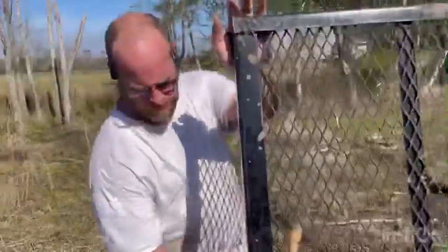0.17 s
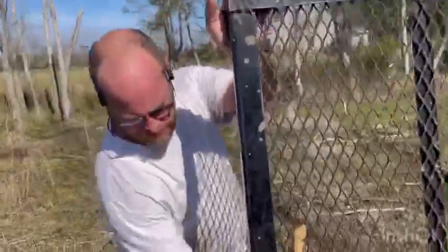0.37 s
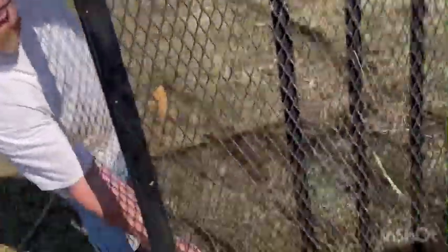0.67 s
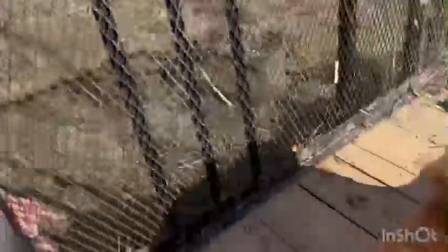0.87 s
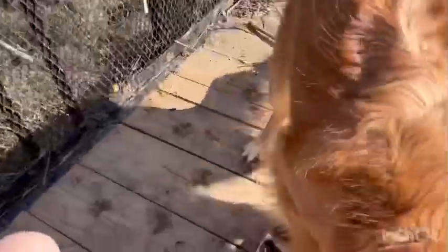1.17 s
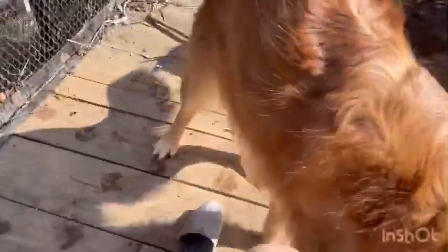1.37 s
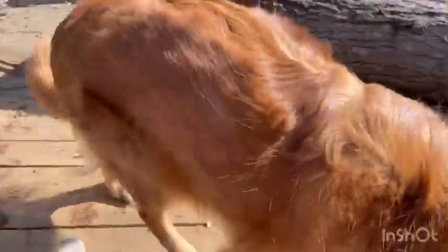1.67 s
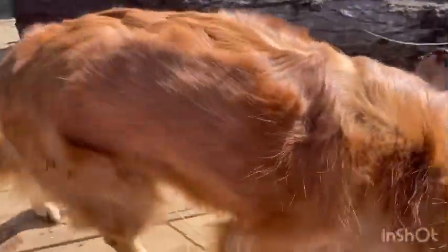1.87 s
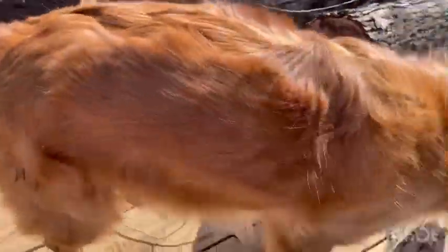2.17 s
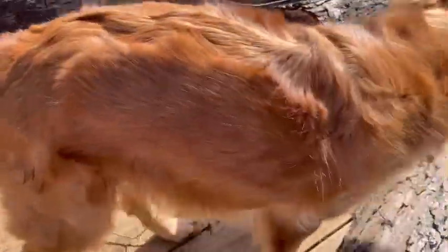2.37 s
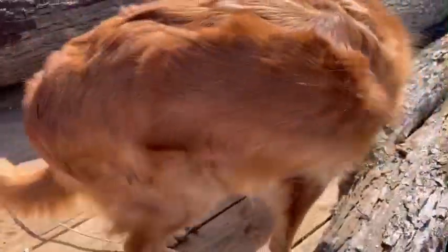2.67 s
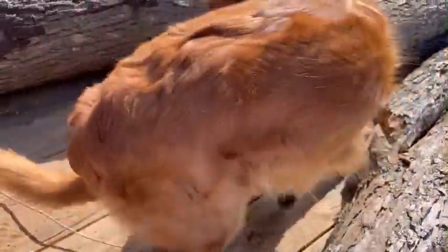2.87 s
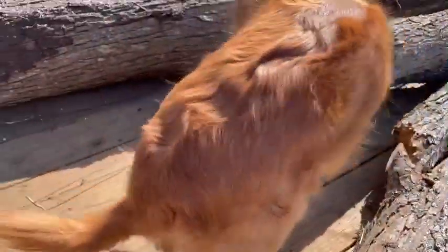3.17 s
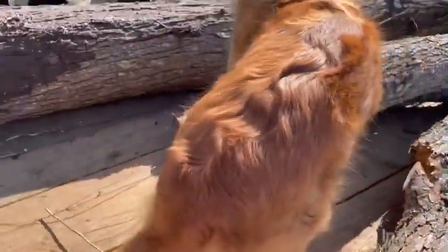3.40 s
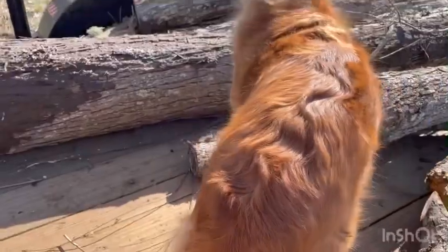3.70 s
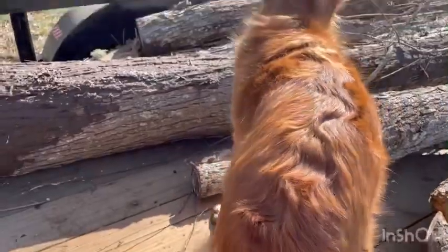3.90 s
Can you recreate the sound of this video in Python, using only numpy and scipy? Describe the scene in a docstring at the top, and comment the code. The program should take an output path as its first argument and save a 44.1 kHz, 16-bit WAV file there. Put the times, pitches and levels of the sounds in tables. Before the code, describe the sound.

Close outdoor sound of a chain-link gate being handled: mesh rustles and wires tick, then knocks grow into heavy rattling and a dry hinge squeal. Soft footfalls bump on a wooden deck, with thin piercing whistles and small squeaks, perhaps a dog whining. Near the end the latch grates and the frame clanks and rings briefly. Faint wind rumble and hiss lie underneath.

```python
"""A chain-link gate is handled outdoors near the microphone, over faint wind rumble and steady hiss (shaped noise).
From the start the mesh rustles (dense random contacts) and its wires tick; a far bird whistles, early and late.
Mesh and frame knock (noise bursts) and wires ring (decaying sines); the microphone turns from the mesh.
Feet bump on a wooden deck; the dry hinge squeals and groans (stick-slip partials). Thin high whistles and short
squeaks, perhaps a dog's whine, are gliding sines. At 3.4 s the gate closes: latch grates, frame clanks and rings."""
import sys
import numpy as np
from scipy import signal
from scipy.fft import rfft, irfft, next_fast_len
from scipy.io import wavfile
from scipy.ndimage import map_coordinates

SR = 44100
rng = np.random.default_rng(int(sys.argv[2]) if len(sys.argv) > 2 else 0)


def pcm_store(signal):
    """Save signal as 16-bit PCM."""
    levels = np.round(np.clip(np.atleast_2d(signal), -1, 1) * 32767)
    wavfile.write(sys.argv[1], SR, levels.astype(np.int16).T)


N = 178252
T = np.arange(N) / SR  # s

# shaking of the gate: t/s, effort/dB
EFFORT = [(0, -54), (.3, -59), (.35, -46.5), (.6, -42.5), (.84, -47), (1.03, -44), (1.42, -26), (1.6, -31),
          (1.97, -28), (2.33, -44.5), (2.5, -41.5), (2.95, -39.5), (3.27, -46.5), (3.56, -37),
          (3.82, -47.5), (4.04, -42)]
# mesh loudness as the microphone turns away: t/s, level/dB
FACING = [(0, 4.5), (.95, 0.5), (1.18, -8), (1.53, -5), (1.75, -15), (2.3, -18), (4.04, -21.5)]
# stereo width: f/Hz, side level/dB
WIDTH = [(60, -13), (150, -27.5), (300, -13), (700, -1.5), (1300, -6), (2500, -2), (6000, -0.5),
         (12000, -2.5)]
# spectrum of fine high hiss and chatter: f/Hz, relative level/dB
SIZZLE = [(3000, -9.5), (6000, -10), (9000, -11), (11500, -7), (12800, -16.5), (13600, -41.5),
          (15600, -21.5), (16400, -53)]
# spectrum of the frame's body: f/Hz, relative level/dB
BODY = [(30, -62.5), (150, -20.5), (420, 1), (720, -3), (1000, -7), (1350, -2), (1750, -9.5), (2200, -7.5),
        (3200, -13.5), (7000, -48)]
# spectrum of jingling wires and scraping grit: f/Hz, relative level/dB
JINGLE = [(900, -43.5), (2100, -0.5), (3000, 1), (4300, 1), (5700, -1.5), (9000, -24.5), (12000, -26),
          (13500, -37.5), (16000, -52)]
CONTACT_S = .0015  # decay constant of a contact's power


def amp(db):
    """Decibels to an amplitude factor."""
    return 10 ** (np.asarray(db) / 20)


def unit(x):
    """x scaled to rms 1."""
    return x / np.sqrt(np.mean(x ** 2) + 1e-20)


def along(points, hz):
    """(Hz, value) points interpolated on a log frequency axis."""
    f, v = np.transpose(points)
    return np.interp(np.log(hz + 1), np.log(f + 1), v)


def curves(rows):
    """One value per sample for each column after the time."""
    s, *cols = np.transpose(rows)
    return [np.interp(T, s, c) for c in cols]


def wobble(rate, size=N):
    """A smooth random curve, rate knots a second."""
    knots = rng.standard_normal(int(size * rate / SR) + 4)
    return map_coordinates(knots, [np.arange(size) * rate / SR])


def filtered(x, response):
    """x times a response of frequency."""
    m = next_fast_len(N + SR // 4)
    return irfft(rfft(x, m) * response(np.fft.rfftfreq(m, 1 / SR)), m)[..., :N]


def add(track, s, sound):
    """Mix a sound into a track at time s."""
    start = max(round(s * SR), 0)
    track[..., start:start + sound.shape[-1]] += sound[..., :N - start]


def mid_side_gain(hz):
    """Mid and side gains: the side level follows WIDTH."""
    return np.array([np.ones_like(hz), amp(along(WIDTH, hz))])


def spread(pair, spectrum):
    """Colour two unrelated signals and make them stereo, rms 1: narrow bass, wide treble."""
    mid, side = filtered(pair, lambda hz: amp(along(spectrum, hz)) * mid_side_gain(hz))
    return unit(np.array([mid + side, mid - side]))


def noise(spectrum):
    """Coloured stereo noise of rms 1."""
    return spread(rng.standard_normal((2, N)), spectrum)


def grains(spectrum, rate, scatter_db, life_s):
    """Countless tiny contacts of uneven size: noise under a sum of decaying powers, rms 1."""
    size = amp(scatter_db * np.minimum(rng.exponential(size=N), 4))
    contacts = (rng.random(N) < rate / SR) * size
    life = np.exp(-np.arange(SR // 100) / SR / life_s)
    power = np.abs(signal.fftconvolve(contacts ** 2, life)[:N])
    return spread(np.sqrt(power) * rng.standard_normal((2, N)), spectrum)


def strike(t, rise, t60):
    """A quick rise and an exponential decay."""
    return (1 - np.exp(-t / rise)) * amp(-60 * t / t60)


def shaking():
    """The frame rumbles in lumps while the linked wires rub and chatter, under a fine high sizzle."""
    # spectra of frame rumble and wire rattle: f/Hz, relative level/dB
    rumble_spectrum = [(20, -33), (40, -30), (60, -2), (80, -2), (115, 3.5), (160, -4.5), (205, -1),
                       (260, -5), (305, -12.5), (350, -9), (480, -13.5), (620, -17.5), (900, -22),
                       (2000, -66)]
    rattle_spectrum = [(200, -58), (450, 13), (800, -0.5), (1200, 4.5), (1700, 2), (2500, 3.5), (4000, -6),
                       (6300, -11), (9000, -25.5), (13000, -32)]
    rumble_db, rattle_db, sizzle_db = 1, -2.5, -5.5  # relative to the effort
    sizzle_shading = 1.54  # treble fades this much faster as the microphone turns
    effort_db, = curves(EFFORT)
    facing_db, = curves(FACING)
    jolt = wobble(29.9)
    rumble = amp(effort_db + rumble_db + 1.8 * jolt) * noise(rumble_spectrum)
    rattle = amp(effort_db + rattle_db + facing_db + 1.3 * jolt) * grains(
        rattle_spectrum, rate=1800, scatter_db=4.5, life_s=0.0029)
    sizzle = amp(effort_db + sizzle_db + sizzle_shading * facing_db) * grains(
        SIZZLE, rate=770, scatter_db=4.0, life_s=0.0036)
    return rumble + rattle + sizzle


def background():
    """A faint rumble of moving air, low-passed noise in gusts, and a steady hiss."""
    # wind: t/s, relative level/dB
    wind_level = [(0.0, -62), (1.28, -50), (1.57, -52), (1.62, -54), (1.97, -40.5), (2.01, -51.5),
                  (2.8, -58.5), (2.9, -30.5), (3.09, -48), (3.23, -30.5), (3.27, -51.5), (3.66, -47.5),
                  (3.72, -57), (4.04, -31)]
    # spectra: f/Hz, relative level/dB
    wind_spectrum = [(15, -8.5), (40, -1), (65, 7), (150, -39.5), (400, -90)]
    hiss_spectrum = [(3000, 3), (6500, -14.5), (9000, -6.5), (10000, 1), (11500, -30.5), (13000, -26)]
    wind_db, gust_db, hiss_db = -2.5, 4, -64.5
    wind = amp(curves(wind_level)[0] + wind_db + gust_db * wobble(6)) * noise(wind_spectrum)
    return wind + amp(hiss_db) * noise(hiss_spectrum)


def ticks():
    """Wires snap over each other, bright and almost without ring; lesser snaps come by chance."""
    # single wire snaps: t/s, relative level/dB, low clack relative to the snap/dB
    snap_rows = [(0.0295, -39.5, 13.5), (0.047, -32, -25), (0.055, -39, -15), (0.175, -30.5, -24),
                 (0.5943, -22, -16), (0.658, -22, -18), (0.6858, -26, -7), (0.7726, -19.5, -16),
                 (0.8115, -24, -10), (0.915, -20.5, -5.5), (0.9384, -25, -17), (0.9882, -35, -12),
                 (1.0246, -18.5, 2), (1.0671, -22.5, 1), (1.114, -25.5, -15), (1.21, -26, -16),
                 (1.2526, -19, -17), (1.261, -17.5, -15), (1.2994, -20, -9.5), (1.3507, -15.5, -24),
                 (1.366, -18, 1), (1.662, -20, -19), (1.741, -23, 9), (1.905, -24.5, -20),
                 (2.0563, -33.5, 4), (2.143, -52, 0.5), (2.532, -27.5, 6.5), (2.7781, -30.5, 5.5),
                 (3.164, -38.5, -15), (3.3703, -27, -1), (3.380, -20, -2), (3.9915, -42.5, 14.5)]
    rise_s, t60_s, tail_db, tail_t60_s = .0002, .009, -13, .035
    stray_per_s, stray_db, stray_scatter_db = 33, -5, 3.5  # stray_db: relative to effort and facing
    snaps, clacks, t = np.zeros(N), np.zeros(N), np.arange(SR // 8) / SR
    shape = strike(t, rise_s, t60_s) + amp(tail_db) * strike(t, rise_s, tail_t60_s)
    for s, db, clack_db in snap_rows:
        add(snaps, s, amp(db - 8.5) * shape)
        add(clacks, s, amp(db - 7.0 + clack_db) * shape)
    level_db = curves(EFFORT)[0] + curves(FACING)[0] + stray_db
    level_db = level_db + stray_scatter_db * rng.standard_normal(N)
    strays = signal.fftconvolve((rng.random(N) < stray_per_s / SR) * amp(level_db), shape)[:N]
    # f/Hz, relative level/dB
    bright = [(1200, -10), (2600, -1.5), (5000, 14.0), (9500, 5.5), (12500, 8.5), (16000, -13.5)]
    return (snaps + strays) * noise(bright) + clacks * noise(BODY)


def bird():
    """Far whistles that swell and die while their pitch falls ever faster."""
    # whistles: t/s, start f/Hz, level/dB, length/s
    whistles = [(0.215, 2680, -54, 0.18), (3.689, 2780, -58.5, 0.2)]
    sag_hz_per_s2 = 14000
    out = np.zeros(N)
    for s, hz, db, length_s in whistles:
        t = np.arange(int(length_s * SR)) / SR
        phase = 2 * np.pi * np.cumsum(hz - sag_hz_per_s2 * t ** 2) / SR
        swell = amp(db + 3.3 * wobble(160, size=len(t))) * np.sin(np.pi * t / length_s) ** 2
        add(out, s, swell * np.sin(phase))
    return out


def resonant(x, resonances):
    """x with narrow second-order resonances ringing on top of it, rms 1."""
    def response(f):
        return 1 + sum(amp(db) * 1j * f * width / (hz * hz - f * f + 1j * f * width)
                       for hz, width, db in resonances)
    return unit(filtered(x, response))


def knocks():
    """The mesh slaps its frame: wires jingle first; the heavy frame swings up and settles more slowly."""
    # slaps: t/s, frame blow/dB, wire jingle/dB, low thud/dB, body t60/s
    slaps = [(0.325, -31, -39.5, -34, 0.27), (0.431, -26, -41.5, -34, 0.42), (0.593, -53, -33, -17, 0.031),
             (0.618, -50, -30, -34.5, 0.19), (0.683, -27.5, -24, -27, 0.088),
             (0.914, -16.5, -50, -40, 0.095), (0.925, -28, -55, -50, 0.04), (1.023, -24, -55, -50, 0.18),
             (1.084, -47, -35, -23.5, 0.13), (1.208, -28, -35, -30, 0.1), (1.225, -25, -44, -29.5, 0.23),
             (1.495, -20.5, -30.5, -35.5, 0.7), (1.527, -17.5, -28.5, -40, 0.19),
             (1.580, -26, -36, -23.5, 0.28), (1.755, -21, -37.5, -29, 0.18), (1.871, -28, -30, -23.5, 0.36),
             (2.053, -27.5, -34, -22.5, 0.17), (2.392, -27.5, -31, -23.5, 0.42),
             (2.604, -34.5, -29, -38.5, 0.078), (2.806, -23.5, -28.5, -18.5, 0.32),
             (3.309, -31, -52, -29.5, 0.3), (3.372, -23.5, -21, -20.5, 0.15),
             (3.384, -22.5, -28, -19.5, 0.16), (3.412, -18, -30, -37, 0.52), (3.447, -26, -36, -49, 0.4)]
    # shivers of the whole mesh: t/s, level/dB
    shivers = [(1.503, -24), (3.405, -26.5)]
    # low thud spectrum: f/Hz, relative level/dB
    thud_spectrum = [(20, -44), (40, -13.5), (85, 2), (120, 9.5), (160, 2.5), (205, 5), (300, 1),
                     (370, -0.5), (600, -9), (1000, -31.5), (3000, -77)]
    # air resonances of the hollow frame tube, excited by the wires: f/Hz, width/Hz, level/dB
    tube = [(1360, 45, 9), (2170, 45, 4.5), (2810, 33, 8), (3670, 40, 9.5), (4400, 60, -2.5),
            (5070, 110, 4.5), (5730, 36, 8)]
    body_db, clatter_db = -5.5, 1.0  # body_db: relative to the blow
    contacts_per_s, contact_scatter_db = 800, 3
    thud, body, jingle, shiver = np.zeros((4, N))
    t = np.arange(SR * 3 // 4) / SR
    for s, blow_db, jingle_db, thud_db, t60 in slaps:
        add(thud, s, amp(thud_db) * strike(t, 0.011, 1.57 * t60))
        add(body, s, amp(blow_db + body_db) * strike(t, 0.0047, t60))
        add(jingle, s, amp(jingle_db) * strike(t, 0.0032, 0.54 * t60))
    for s, db in shivers:
        add(shiver, s, amp(db) * strike(t, rise=0.019, t60=0.26))
    clatter = amp(clatter_db * wobble(110))  # wires bounce on the frame in quick clumps
    wires = resonant(grains(JINGLE, contacts_per_s, contact_scatter_db, CONTACT_S), tube)
    frame = grains(BODY, contacts_per_s, contact_scatter_db, life_s=0.0045)
    struck = clatter * (body * frame + jingle * wires)
    return thud * noise(thud_spectrum) + struck + shiver * noise(SIZZLE)


def ringing(blows, modes):
    """Each start sets all modes off together; each mode wavers and reaches the two ears at its own phase."""
    out, t = np.zeros((2, N)), np.arange(SR) / SR
    for s, db, rise in blows:
        for hz, level, t60 in modes:
            phase = 2 * np.pi * hz * t + 1.0 * wobble(35.8, size=SR)
            apart = rng.choice([-1, 1]) * np.arctan(amp(along(WIDTH, hz))) * np.array([[1], [-1]])
            gain = amp(db + level + rng.normal(0, 1))
            add(out, s, gain * strike(t, rise, t60) * np.sin(phase + apart))
    return out


def clanks():
    """Modes of frame (low) and loose bar (short, hollow) ring a little to the left; plucked wire rings high."""
    # modes of the steel frame, the loose bar and a taut mesh wire: f/Hz, level/dB, t60/s
    frame_modes = [(278.4, 0, 0.31), (351.3, 6.5, 0.41), (440, -4, 0.35), (478, -1, 1), (569, -2.5, 0.71),
                   (708, -2.5, .25), (759, -4.5, 0.53), (924, -11, 0.26), (960, 1, 0.54), (984, 8.5, 0.25),
                   (1025, 0, 0.63), (1139, 2, 0.87), (1173, -3, 0.73), (1443, 0, 0.27), (1590, -19.5, 0.34),
                   (1926, -14.5, 0.4), (2195, -6, 0.24), (2680, -15.5, 0.5), (3176, -18, .33),
                   (3560, -11, 0.26)]
    bar_modes = [(691, -4, 0.12), (875, 2.5, 0.1), (919, 0.5, .2), (1060, -2, 0.045), (1280, -12, 0.11),
                 (2030, -14.5, 0.27), (2020, -21, 0.17), (2660, -14, 0.079), (2960, -17.5, 0.088)]
    wire_modes = [(1225, 2, 0.099), (1580, -2.5, 0.043), (1910, -6.5, 0.23), (2065, 14.5, 0.018),
                  (2290, -3.5, 0.15), (2730, -6.5, 0.18), (3010, -7.5, 0.27), (3310, 12, 0.018),
                  (3460, -4.5, 0.03), (3770, -11.5, 0.28)]
    # blows on the frame, bar bounces and wire plucks: t/s, level/dB, rise/s
    frame_blows = [(1.511, -50, 0.009), (1.761, -40.5, 0.0011), (1.873, -45, 0.0014),
                   (3.405, -19.5, 0.0047)]
    bar_blows = [(1.7595, -21, .0012), (1.779, -26, 0.0026), (1.866, -29, 0.00066)]
    wire_plucks = [(0.327, -37.5, 0.0025), (0.435, -28.5, 0.00066), (0.685, -43, 0.00018),
                   (0.917, -70, 0.00089), (2.397, -32, 0.0064), (2.603, -44.5, 0.0023),
                   (2.811, -32.5, 0.0022), (3.422, -28.5, .003)]
    steel = ringing(frame_blows, frame_modes) + ringing(bar_blows, bar_modes)
    return steel * amp([[1.1], [-1.1]]) + ringing(wire_plucks, wire_modes)


def bumps():
    """Soft footfalls push the deck boards; the pitch sags as the weight settles."""
    # footfalls: t/s, mid f/Hz, level/dB, length/s
    footfalls = [(1.234, 124, -18.5, 0.045), (1.31, 110, -21.5, 0.039), (1.569, 91, -19, 0.056),
                 (1.925, 115, -30, 0.032), (2.048, 243, -20.5, 0.044), (2.887, 66.3, -25.5, 0.073),
                 (3.188, 96.5, -20.5, 0.039), (3.963, 59, -35, 0.096)]
    out = np.zeros(N)
    for s, hz, db, length_s in footfalls:
        u = np.linspace(0, 1, int(length_s * SR))
        phase = 2 * np.pi * np.cumsum(hz * (1 + 0.55 * (.5 - u))) / SR
        add(out, s, amp(db) * np.sin(np.pi * u) ** 2 * np.sin(phase))
    return out


def mesh_ring(x):
    """Decaying noise, like the countless modes of a wire mesh, draws a sound out into a short stereo wash."""
    # wash decay: f/Hz, t60/s
    mesh_t60 = [(200, 1), (1000, 0.43), (3000, 0.38), (7000, 0.23), (13000, 0.12)]
    hz, t, z = signal.stft(rng.standard_normal((2, SR // 2)), SR, nperseg=256)
    decay = amp(-60 * t / along(mesh_t60, hz)[:, None])
    mid, side = signal.istft(z * decay * mid_side_gain(hz)[..., None], SR, nperseg=256)[1]
    tail = np.array([mid + side, mid - side])
    return signal.fftconvolve(x[None], tail / np.linalg.norm(tail[0]), axes=1)[:, :N]


def rubbed(wave):
    """A friction tone a little to the left: a direct path plus a path through the mesh."""
    # path gains: f/Hz, level/dB
    direct_path = [(1000, 0), (2500, -1), (6000, -4)]
    mesh_path = [(400, -7), (900, -9), (2000, -8), (3500, -9), (6000, -12)]
    direct = filtered(wave, lambda hz: amp(along(direct_path, hz)))
    washed = mesh_ring(filtered(wave, lambda hz: amp(along(mesh_path, hz))))
    return (direct + washed) * amp([[1], [-1]])


def slips():
    """Dry steel sticks and slips in hinge, then latch: each slip swells, bends in an arch, scrapes and dies."""
    # slips: t/s, start f/Hz, end f/Hz, arch as a share of the pitch, fundamental/dB, hold/s,
    # second partial/dB, third partial/dB, fall per further partial/dB, roughness as a share of the pitch
    slip_rows = [(1.395, 1084, 1044, 0.016, -21, 0.018, -6.5, -1, 8, 0.03),
                 (1.416, 1042, 1002, -0.015, -24, 0.022, -1, 2.5, 8, 0.02),
                 (1.428, 1034, 1051, -0.02, -28, 0.01, -3, 4, 4.5, .03),
                 (1.444, 1025, 1091, 0.031, -17.5, 0.012, -6, -13, 6.5, 0.06),
                 (1.461, 1084, 1055, 0.013, -21.5, 0.015, -2, -10, 9, 0.11),
                 (1.48, 1071, 1077, 0.012, -21.5, 0.036, -3, -1, 7, 0.04),
                 (1.496, 449, 434, -0.0015, -13.5, 0.021, -7.5, -10.5, 13, 0.02),
                 (1.508, 1033, 1019, 0.0028, -7, 0.011, -17, -16.5, 5, .03),
                 (1.529, 1035, 966, 0.0092, -14, 0.014, -14, -11.5, 5.5, 0.03),
                 (1.536, 471, 469.5, -0.0037, -12.5, 0.012, -3.5, -21, -1.5, 0),
                 (1.562, 995, 992, 0.01, -20, 0.0099, -16, -11, 8, 0.08),
                 (1.869, 601.5, 574, 0.0072, -24, 0.03, -15.5, -34.5, 17, 0.08),
                 (3.402, 935, 986, 0.015, -15.5, 0.019, -22, -25, 4, 0.02),
                 (3.411, 438, 458, -0.0028, -8.5, 0.01, -14.5, -12, 16, 0.04),
                 (3.406, 300, 322, -0.01, -20, 0.017, -4.5, -18, 10, 0.03),
                 (3.418, 1062, 1114, 0.0045, -23, 0.015, 2.5, -12, 1, 0.01),
                 (3.424, 1138, 1165, 0.012, -18.5, 0.011, -13, -5.5, 8.5, 0.05),
                 (3.444, 482, 497, 0.006, -13, 0.0079, -12, -25, 11, 0.09),
                 (3.451, 1122, 1051, 0.012, -20, 0.01, -15, -6, 9, 0)]
    # the steel favours one region of the treble: f/Hz, level/dB
    steel_colour = [(1500, -2.5), (2500, -8), (3200, -5), (4000, -6.5), (7000, 5.5)]
    rise_s, t60_s, flutter_db = .003, 0.07, 2.5  # flutter: unevenness of the friction
    bend, jitter_per_s, partial_count = .008, 260, 6  # bend: share of the pitch
    scrape_db = -30  # grit between the sliding faces
    (out, grit), t = np.zeros((2, N)), np.arange(SR // 4) / SR
    for s, start_hz, end_hz, arch, db, hold, second_db, third_db, fall_db, rough in slip_rows:
        u = np.minimum(t / hold, 1)
        glide = (start_hz + (end_hz - start_hz) * u) * (1 + arch * np.sin(np.pi * u))
        jitter = rough * wobble(jitter_per_s, size=len(t)) + bend * wobble(65.0, size=len(t))
        phase = 2 * np.pi * np.cumsum(glide * (1 + jitter)) / SR
        upper = sum(amp(third_db - fall_db * (k - 3)) * np.sin(k * phase)
                    for k in range(3, partial_count + 1))
        wave = np.sin(phase) + amp(second_db) * np.sin(2 * phase) + upper
        swell = (1 - np.exp(-t / rise_s)) * amp(-60 * np.maximum(t - hold, 0) / t60_s)
        force = amp(db + flutter_db * wobble(136, size=len(t))) * swell
        add(out, s, force * np.sqrt(2) * wave)
        add(grit, s, force)
    tones = rubbed(filtered(out, lambda hz: amp(along(steel_colour, hz))))
    return tones + amp(scrape_db) * grit * grains(JINGLE, rate=360, scatter_db=3.5, life_s=CONTACT_S)


def chirps():
    """Very high thin whistles, perhaps a dog's whine; the two channels are out of step."""
    # thin high chirps: t/s, start f/Hz, level/dB, rise/s, roughness (relative amplitude)
    chirp_rows = [(1.897, 13020, -8.5, 0.013, 0.58), (2.207, 13360, -2.5, 0.017, 0.13),
                  (2.36, 14000, -33, 0.031, 0.4), (2.602, 13350, -2, 0.018, 0.31),
                  (2.62, 12180, -33, 0.017, 1.1), (2.79, 14120, -42, 0.025, 0.4),
                  (3.123, 13350, -11.5, 0.019, 0.23), (3.165, 13440, -12.5, 0.0087, 0.25)]
    settle_s, t60_s = 0.06, 0.13  # settle: decay constant of the fast flicker
    out, t = np.zeros((2, N)), np.arange(SR // 3) / SR
    channels = np.exp(1j * np.array([[1.12], [-1.12]]))  # phase/rad

    def flicker(rate):
        return np.array([wobble(rate, size=len(t)) + 1j * wobble(rate, size=len(t)) for _ in range(2)])

    for s, hz, db, rise, rough in chirp_rows:
        attack = np.sin(np.pi / 2 * np.minimum(t / rise, 1)) ** 2
        swell = attack * amp(-60 * np.maximum(t - rise, 0) / t60_s)
        phase = 2 * np.pi * np.cumsum(hz - 110 * np.minimum(t / 0.089, 1)) / SR
        fast = amp(-2.5) * flicker(800) + amp(-9.5) * flicker(2000)
        scatter = flicker(280) + np.exp(-t / settle_s) * fast
        wave = (channels + rough * np.minimum(t / 0.033, 1) * scatter) * np.exp(1j * phase)
        add(out, s, amp(db) * swell * wave.real)
        # a faint octave below follows the strong ones
        octave = (flicker(277.5) * np.exp(1j * phase / 2)).real
        add(out, s + 0.029, amp(3.2 * db - 39.0) * np.sqrt(swell) * octave)
    return out


def squeaks():
    """Short gliding squeaks, perhaps a dog's whine; a lone 1150 Hz tone rings on after loud ones."""
    # squeaks: t/s, start f/Hz, end f/Hz, level/dB, length/s, roughness as a share of the pitch
    squeak_rows = [(2.197, 1338, 1540, -32.5, 0.031, 0.02), (2.204, 1253, 1201, -30.5, 0.027, 0.02),
                   (2.592, 1396, 1536, -24, 0.022, 0.05), (2.607, 1225, 1204, -21.5, 0.02, 0.04),
                   (2.623, 1303, 1270, -34, 0.033, 0.08), (2.778, 1436, 1424, -35, 0.075, 0.03),
                   (3.113, 1432, 1220, -41.5, 0.061, 0.05), (3.917, 2930, 2840, -52.5, 0.078, 0.06),
                   (3.845, 1277, 1326, -49.5, 0.042, 0.11), (3.914, 1440, 1560, -51, 0.063, 0.07),
                   (3.966, 1645, 1653, -43, 0.058, 0.09)]
    # squeak spectrum: f/Hz, level/dB
    squeak_colour = [(1600, -1), (2000, -5.5), (2450, 4.5), (3000, -9), (3570, 6), (4000, -4),
                     (6000, -12.5)]
    # lone tone that rings on: f/Hz, level/dB, t60/s
    lone_tone = [(1150, 1.5, 1)]
    # its starts: t/s, level/dB, rise/s
    tone_starts = [(2.215, -50, .006), (2.613, -33.5, .006)]
    rasp_db = 3
    out = np.zeros(N)
    for s, start_hz, end_hz, db, length_s, rough in squeak_rows:
        u = np.linspace(0, 1, int(length_s * SR))
        jitter = 1 + rough * wobble(600, size=len(u))
        phase = 2 * np.pi * np.cumsum((start_hz + (end_hz - start_hz) * u) * jitter) / SR
        rasp = sum(amp(rasp_db) * wobble(700, size=len(u)) * np.sin(k * phase) for k in (2, 3))
        swell = amp(db + 1.3 * wobble(130, size=len(u))) * np.sin(np.pi * u)
        add(out, s, swell * (np.sin(phase) + swell * rasp))  # louder squeaks rasp more
    out = filtered(out, lambda hz: amp(along(squeak_colour, hz)))
    return out + amp(-7.5) * mesh_ring(out) + ringing(tone_starts, lone_tone)


def scene():
    """All sources summed."""
    gate = shaking() + ticks() + knocks() + clanks() + slips()
    whines = chirps() + squeaks()
    return gate + whines + bumps() + bird() + background()


def record(dry):
    """A deep treble notch and band limit colour the sound; a soft limiter rounds the loudest peaks."""
    # overall response: f/Hz, level/dB
    response = [(20, -8), (40, 2), (100, -.5), (6300, -0.5), (6800, -6.5), (7250, -17.5), (7900, -18.5),
                (8500, -4), (9100, 2.5), (13900, -4.5), (14800, -5)]
    top_hz = 16400
    coloured = filtered(dry, lambda hz: amp(along(response, hz)))
    rounded = coloured / (1 + np.abs(coloured / .93) ** 6) ** (1 / 6)
    return filtered(rounded, lambda hz: hz < top_hz)


dry = scene()
out = record(dry)
pcm_store(out)
```